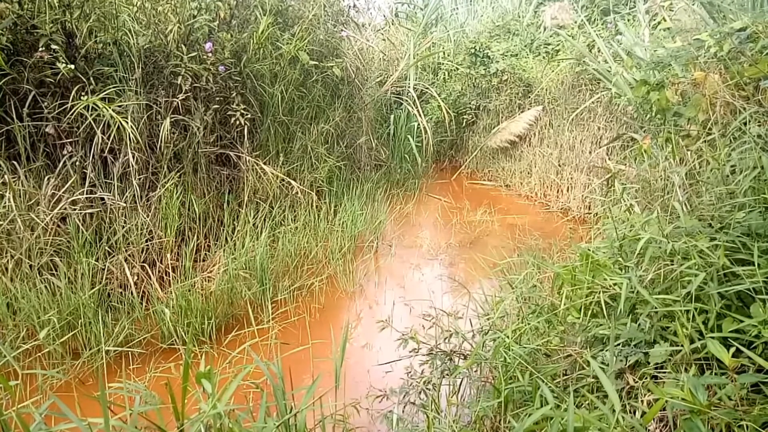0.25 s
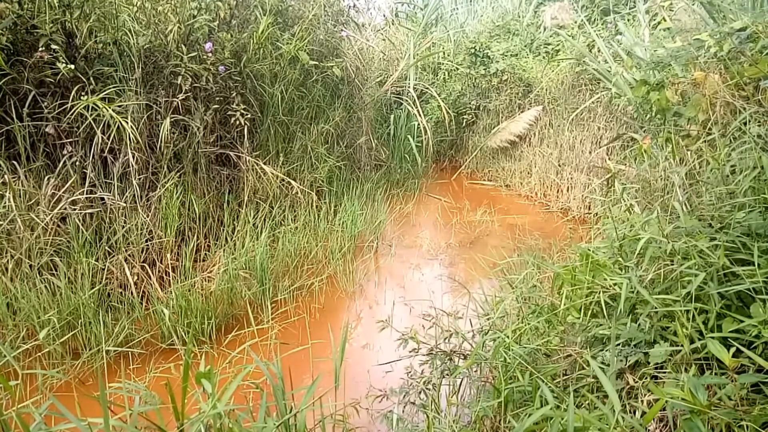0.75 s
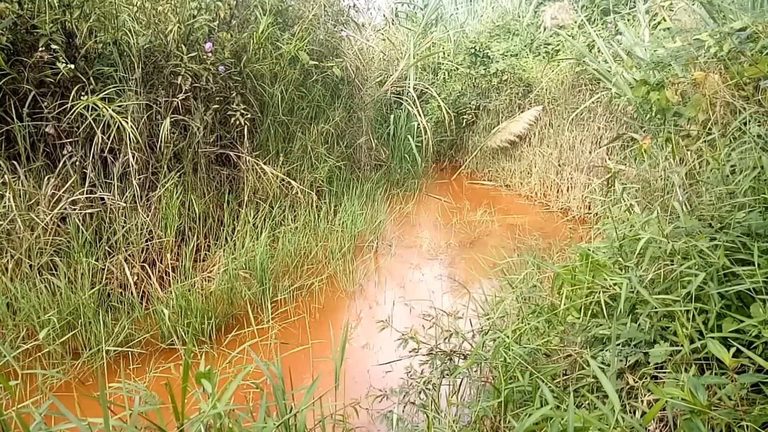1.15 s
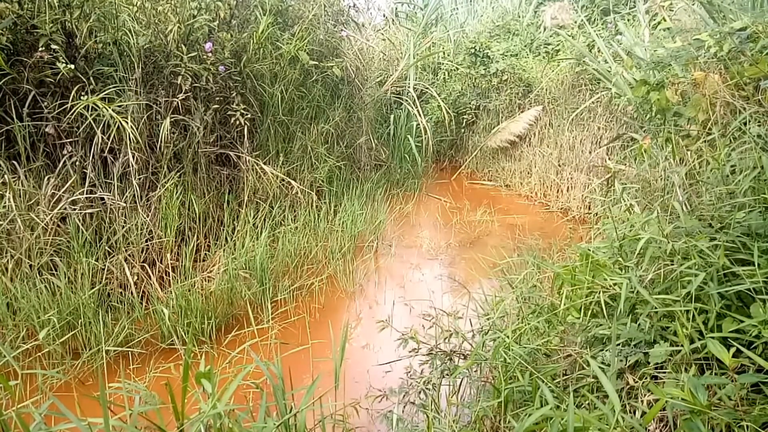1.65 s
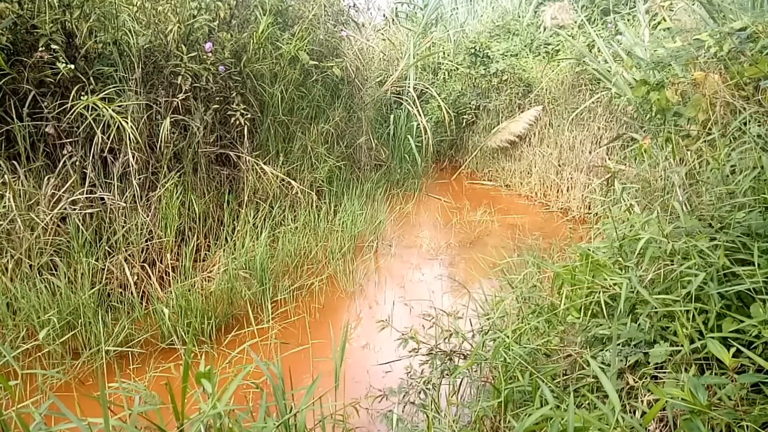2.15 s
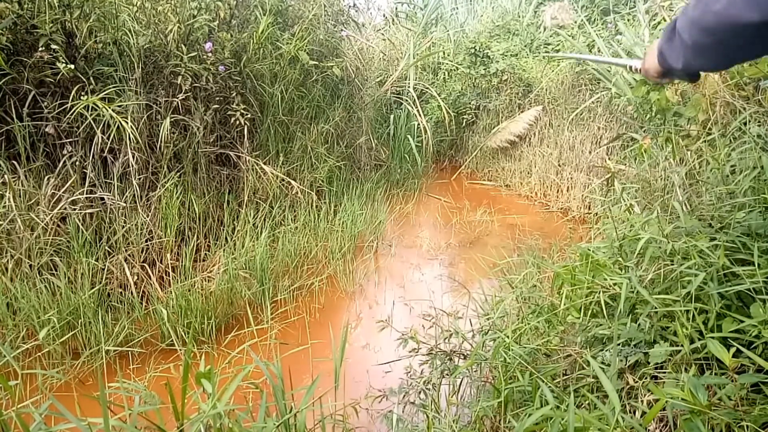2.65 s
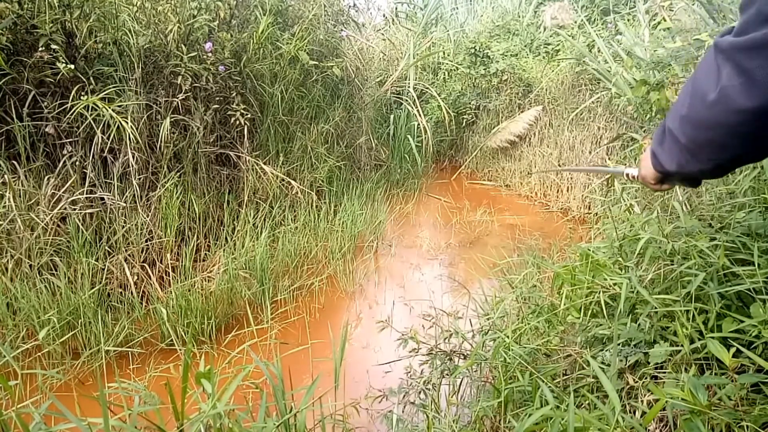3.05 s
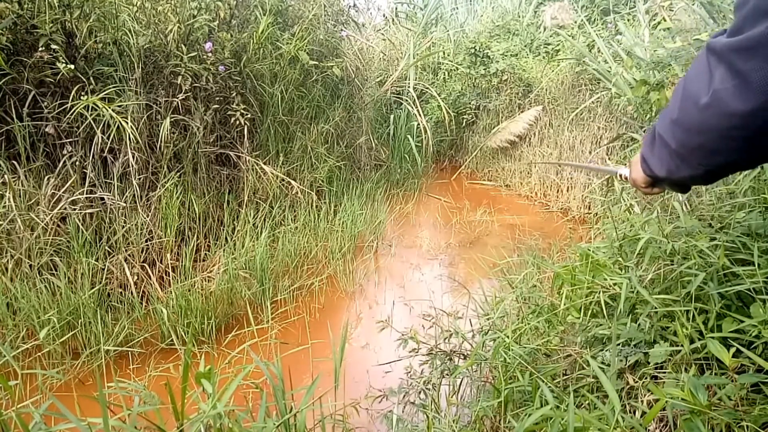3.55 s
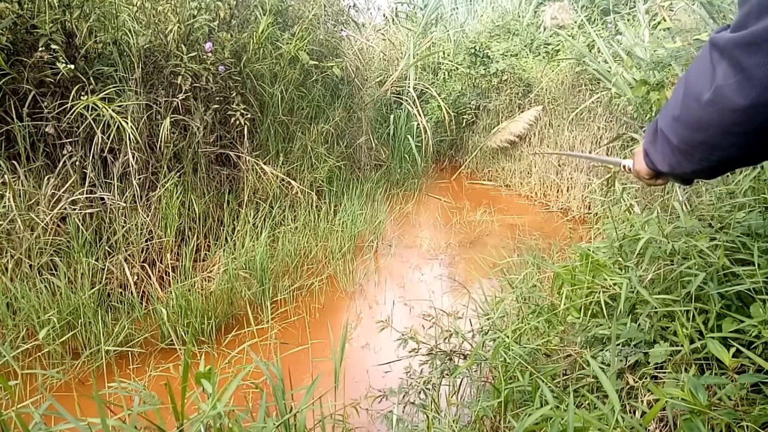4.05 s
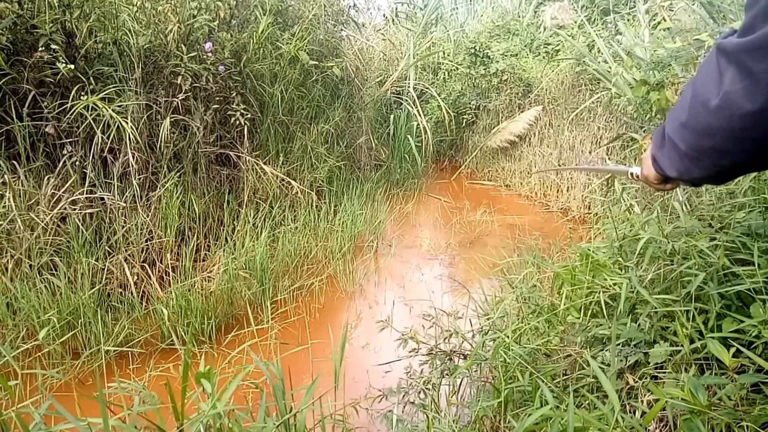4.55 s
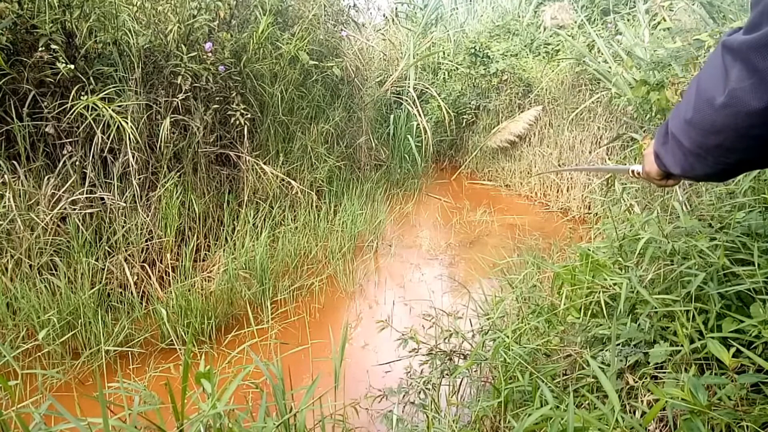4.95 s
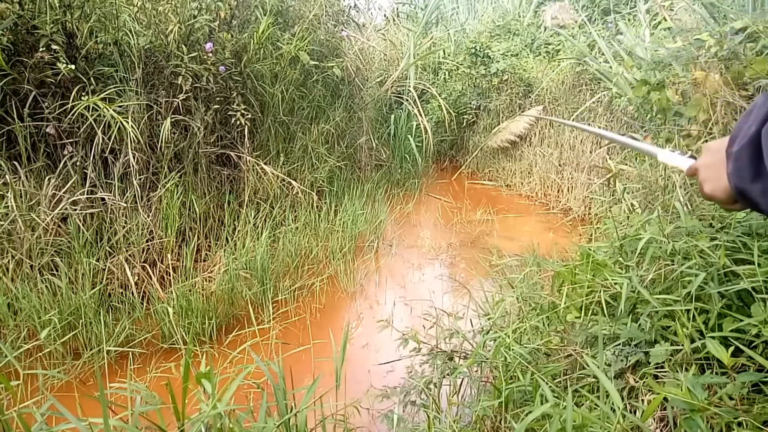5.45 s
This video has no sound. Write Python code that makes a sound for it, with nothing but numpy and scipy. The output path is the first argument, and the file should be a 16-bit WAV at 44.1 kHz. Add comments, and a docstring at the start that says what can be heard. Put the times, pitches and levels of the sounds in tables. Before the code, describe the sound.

Outdoors by a still, overgrown ditch, a near cicada and crickets buzz in fast high pulses over a far insect chorus. A bird repeats a chip, low note and rising whistle about every 0.6 seconds, with small pips, leaf rustles and a dull rod knock. Dove coos come late. The sound fades to silence, then cuts hard to insects over a slow, far engine throb.

```python
"""Insects and birds by a still ditch

A near cicada and crickets (pulsed, slightly fuzzy tones) sing over a far chorus of coloured noise.
Gliding whistles make a bird's three-note phrase, small pips and chips, and a dove's coos; leaves are
brushed noise, twigs and a rod short ringing hits. The sound fades to silence, then cuts to a second
spot where a slow engine, a train of rounded low thumps, throbs far off under the insects."""
import sys
import numpy as np
from scipy import signal
from scipy.io import wavfile
from scipy.ndimage import uniform_filter1d

SR = 44100
rng = np.random.default_rng(int(sys.argv[2]) if len(sys.argv) > 2 else 0)


def file_out(sig):
    """Save sig as 16-bit WAV at sys.argv[1]."""
    # one column per channel
    cols = np.atleast_2d(sig).T
    # limit, then scale
    lim = np.clip(cols, -1, 1)
    pcm = np.round(lim * 32767).astype(np.int16)
    wavfile.write(sys.argv[1], SR, pcm)


def volts(x):
    """Linear amplitude factor 10**(x/20) for a level x in dB, scalar or array-like."""
    e = np.asarray(x, float) / 20
    return 10 ** e


N = 252252  # samples

CUT = 5.2105  # s, where the second spot begins
EDGE_DB = -19.5  # level where a swell begins and a fade ends, against its peak


def evened(x):
    """Scales to an rms of 1."""
    return x / np.sqrt(np.mean(x ** 2) + 1e-20)


def add(mix, s, sound):
    """Lays a sound into the mix from second s."""
    part = mix[max(round(s * SR), 0):][:len(sound)]
    part += sound[:len(part)]


def bell(t, middle, half):
    """A rounded Gaussian swell around its middle."""
    return np.exp(-.5 * ((t - middle) / half) ** 2)


def fuzzy(hz, width_hz, clear):
    """A whistle on the curve hz: a steady part plus a part that fades and drifts at random; rms 1."""
    poles = np.poly(np.full(4, np.exp(-2 * np.pi * width_hz / SR)))
    settle = 3000  # samples
    random = rng.standard_normal((len(hz) + settle, 2)) @ [1, 1j]
    drift = signal.lfilter([1], poles, random)[settle:]
    response = signal.lfilter([1], poles, signal.unit_impulse(settle))
    drift /= np.sqrt(2) * np.linalg.norm(response)
    clear = np.clip(clear, 0, 1)
    wander = clear + np.sqrt(1 - clear ** 2) * drift
    carrier = np.exp(2j * np.pi * np.cumsum(hz) / SR)
    return np.sqrt(2) * (wander * carrier).real


def noise(points, patchy_db):
    """Noise of a given colour with drifting louder and softer patches; rms 1."""
    hz = np.fft.rfftfreq(1024, 1 / SR)
    f, db = np.transpose(points)
    a, b, patches = rng.standard_normal((N // 256 + 5, 513, 3)).T
    patches = uniform_filter1d(patches, size=10, axis=0)
    patches = evened(uniform_filter1d(patches, size=12, axis=1))
    colour = np.interp(np.log(hz + 1), np.log(f + 1), db, left=-90, right=-90)
    z = (a + 1j * b) * volts(colour[:, None] + patchy_db * patches)
    return evened(signal.istft(z, nperseg=1024, noverlap=768)[1][:N])


def ring(modes, seconds):
    """A struck body: sines that each die away at their own rate."""
    t = np.arange(round(seconds * SR)) / SR
    return sum(volts(db - 60 * t / t60) * np.sin(2 * np.pi * hz * t) for hz, db, t60 in modes)


def whistle(out, t, hz, db, fuzz_hz, clear):
    """A near-sine note at times t that wavers on its way through the leaves."""
    edge = np.clip(np.minimum(t - t[0], t[-1] - t) / 0.002, 0, 1)
    note = edge * volts(db) * fuzzy(hz + 0 * t, fuzz_hz, clear)
    add(out, t[t >= 0][0], note[t >= 0])


def peaked(rise, fall):
    """Time from the peak, and a level in dB that swells to it and fades after it."""
    u = np.arange(-rise, fall, 1 / SR)
    return u, EDGE_DB * np.maximum(-u / rise, u / fall)


# Colour of still air and microphone hiss. Each row: frequency in Hz, relative level in dB per Hz.
AIR_COLOUR = [(20, -8), (40, -12), (80, 2), (134, 0), (330, -6), (570, -8.5), (1100, -12), (2200, -13.5),
              (4300, -17), (5100, -26), (9500, -40), (12000, -30), (13800, -27), (15600, -26)]
# Air level in dB, before and after the cut.
AIR_LEVELS = -70, -68.5
# Colour of the far insect chorus, one list before and one after the cut.
# Each row: frequency in Hz, relative level in dB per Hz.
CHORUS_COLOURS = ([(5000, -57.5), (5600, -40.5), (5860, -27.5), (6260, -14.5), (6640, -0.5), (6970, 1.5),
                  (7470, -2), (8250, -3.5), (8420, -15), (8700, -34), (9500, -39), (9900, -45)],
                  [(4400, -36), (5000, -51), (5640, -30.5), (6170, -16), (6550, -7.5), (6940, -1),
                  (7730, -8.5), (8150, -7), (8400, -20.5), (8700, -17), (9300, -31), (9800, -45)])
# Chorus level in dB, before and after the cut.
CHORUS_LEVELS = -50, -50.5


def background():
    """Steady noise for air and hiss, and narrow high noise for many far insects; both change at the cut."""
    after = np.arange(N) > CUT * SR
    first, second = (volts(db) * noise(colour, patchy_db=0.5)
                     for colour, db in zip(CHORUS_COLOURS, CHORUS_LEVELS))
    chorus = np.where(after, second, first)
    air_db = np.where(after, AIR_LEVELS[1], AIR_LEVELS[0])
    return chorus + volts(air_db) * noise(AIR_COLOUR, patchy_db=0.78)


# The cicada's group of four pulses. Each row: place in pulses, relative level in dB.
PULSE_GROUP = [(0, -7), (1.002, -2.5), (1.918, -1.7), (2.829, -13)]
# Pulse clock: rate at 0 s, loss of rate per second, count at 0 s
PULSES_PER_S, SLOWING, PULSE_START = 81.65, .104, -.18


def cicada():
    """Short falling tone bursts in groups of four, each a little off the last in pitch and strength."""
    now = np.arange(N) / SR
    count = PULSE_START + PULSES_PER_S * now - SLOWING * now ** 2 / 2
    pulse = np.round(count)
    strength, pitch = rng.standard_normal((500, 2))[pulse.astype(int)].T
    bursts = 0
    for place, db in PULSE_GROUP:
        offset = (count - place + 2) % 4 - 2  # in pulses
        bursts = bursts + volts(db) * bell(offset, 0, 0.19)
    hz = 6890 + 500 * (pulse - count) + 14 * pitch
    tone = volts(1.6 * strength) * fuzzy(hz, width_hz=120, clear=.9)
    return volts(-41.5) * bursts * tone * (now < CUT)


# Chirping insects. Each row: pitch in Hz, fuzz in Hz, clear share, glide in Hz over a chirp's second half,
# nominal share of the period sounding, chirp centre in periods, trill in Hz (0 for none).
CHIRPERS = [(7925, 50, .9, -90, .4, 0, 0), (8220, 120, .5, -40, .55, 0, 0), (8585, 40, .7, 0, .55, 0, 0),
            (9020, 340, 0, 0, .95, .04, 124), (8900, 340, 0, 0, .95, 0, 131),
            (8950, 260, .3, 0, .68, 0, 131), (8190, 40, .85, -200, .55, .06, 0),
            (8270, 50, .85, 0, .4, -.47, 0), (9450, 180, 0, 0, .8, 0, 0)]
# Level of each voice. Each row: dB at its start, dB at its end.
CHIRPER_LEVELS = [(-53, -53.5), (-58, -58), (-73, -70), (-65, -65), (-73, -64), (-64, -62), (-51.5, -51.5),
                  (-54, -54), (-80, -79)]
# Song of each voice. Each row: start in seconds, end in seconds, chirps per second,
# share of a period gone at the start.
CHIRPER_SONGS = [(0, 5.2, 12.13, .62), (0, 5.2, 13.45, .3), (0, 3.3, 13.45, .31), (0, 1.1, 7.27, .57),
                 (2.4, 5.2, 8.25, .55), (5.21, 5.72, 8.35, .45), (5.21, 5.72, 12.9, .77),
                 (5.21, 5.72, 12.9, .74), (1.3, 4.1, 12.85, .5)]


def crickets():
    """Each voice opens once a period; katydids also trill within the chirp."""
    out = np.zeros(N)
    for voice, levels, song in zip(CHIRPERS, CHIRPER_LEVELS, CHIRPER_SONGS):
        hz, fuzz_hz, clear, glide_hz, share, centre, trill_hz = voice
        start, end, rate, gone = song
        t = np.arange(start, end, 1 / SR)
        period = gone + rate * (t - start) - centre
        place = ((period + .5) % 1 - .5) / share  # -.5 to .5 within a chirp
        gate = np.clip(2.6 * (.5 - abs(place)) + .3, 0, 1) ** 2
        trill = 1 + .6 * np.cos(2 * np.pi * trill_hz * t) * (trill_hz > 0)
        glide = glide_hz * np.clip(place, 0, .5) ** 2 * 4
        tone = fuzzy(hz + glide, fuzz_hz, clear)
        add(out, start, volts(np.interp(t, [start, end], levels)) * gate * trill * tone)
    return out


# Colour of the leaves, one list for body and one for treble.
# Each row: frequency in Hz, relative level in dB per Hz.
LEAF_COLOURS = ([(1500, -21), (3000, -13.5), (4300, -8.5), (5600, -1.5), (7000, 1.5), (9000, -34)],
                 [(7000, -26), (9500, -8), (13000, -11.5), (15600, -11)])
# Leaves brushed. Each row: peak time in seconds, body level in dB, treble level in dB,
# body rise in dB per second, body fall in dB per second.
LEAF_BRUSHES = [(0, -51.5, -64.5, 100, 139), (1.881, -88.5, -97.5, 94, 49), (2.149, -58, -84, 61, 39.5),
                (2.5, -69.5, -97.5, 25.5, 65), (3.08, -71, -90.5, 25, 48), (5.3, -62.5, -93.5, 140.5, 42)]
STIR_DB, STIR_TREBLE_DB = -82, -88  # leaves stirring all the time
TREBLE_FOLLOWS = 0.83  # share of the body's rise and fall in dB that the treble makes


def leaves():
    """Many small rubbing contacts heard as patchy noise, swelling with each brush."""
    now = np.arange(N) / SR
    body, treble = (noise(colour, patchy_db=2.8) for colour in LEAF_COLOURS)
    out = volts(STIR_DB) * body + volts(STIR_TREBLE_DB) * treble
    for s, db, treble_db, rise, fall in LEAF_BRUSHES:
        off_db = np.maximum(rise * (s - now), fall * (now - s))
        same_spot = (now > CUT) == (s > CUT)
        brushed = volts(db - off_db) * body + volts(treble_db - TREBLE_FOLLOWS * off_db) * treble
        out += same_spot * brushed
    return out


# Rising notes. Each row: start in seconds, length in seconds, level in dB, top pitch in Hz,
# lead-in before it in seconds.
RISING_NOTES = [(.206, 0.17, -49, 2285, 0.018), (0.788, .145, -47.5, 2317, 0.027),
                (1.441, 0.12, -49, 2232, 0.032), (2.024, .15, -49, 2306, 0.054),
                (2.618, .16, -48, 2268, 0.03), (3.244, 0.11, -48, 2281, 0.042),
                (3.862, .13, -51, 2246, 0.055), (4.468, .14, -50, 2307, 0.058),
                (5.072, 0.08, -54.5, 2270, 0.041)]
# Low closing notes. Each row: peak time in seconds, level in dB, pitch at the peak in Hz.
LOW_NOTES = [(0.011, -53.5, 1706), (0.574, -58.5, 1699), (1.221, -55, 1717), (1.817, -57.5, 1717),
             (2.395, -52.5, 1712), (3.017, -55, 1683), (3.621, -50.5, 1715), (4.24, -51.5, 1690),
             (4.845, -58, 1665)]
FOOT_HZ, CLIMB_BEND = 2074, 1.69  # the pitch climbs from here to its top, slowing on the way
SWELL_DB, SWELL_S, CLOSE_DB, CLOSE_S = -9.5, .06, -7.5, 0.051  # soft start, fading end
LEAD_HZ, LEAD_SCOOP_HZ, LEAD_SCOOP_S = 1960, 330, .008  # scooped up from below
LEAD_DB, LEAD_FADE_DB = -11, -8  # against the rising note
LOW_RISE_S, LOW_FALL_S, LOW_GLIDE_HZ_PER_S = .045, .065, 550


def phrase():
    """Near-sine whistles: a scooped lead-in, a rising note and a low closing note."""
    out = np.zeros(N)
    for s, length, db, hz, lead in RISING_NOTES:
        u = np.arange(0, lead, 1 / SR)
        scoop = np.exp(-u / LEAD_SCOOP_S)
        lead_db = db + LEAD_DB + EDGE_DB * scoop + LEAD_FADE_DB * u / lead
        whistle(out, s - lead + u, LEAD_HZ - LEAD_SCOOP_HZ * scoop, lead_db, fuzz_hz=60, clear=.7)

        u = np.arange(0, length, 1 / SR)
        climb = hz - (hz - FOOT_HZ) * (1 - u / length) ** CLIMB_BEND
        swell_db = SWELL_DB * np.clip(1 - u / SWELL_S, 0, 1)
        close_db = CLOSE_DB * np.clip(1 - (length - u) / CLOSE_S, 0, 1)
        whistle(out, s + u, climb, db + (swell_db + close_db), fuzz_hz=60, clear=.86)
    for s, db, hz in LOW_NOTES:
        u, shape_db = peaked(LOW_RISE_S, LOW_FALL_S)
        whistle(out, s + u, hz + LOW_GLIDE_HZ_PER_S * u, db + shape_db, fuzz_hz=60, clear=.82)
    return out


# Thin pips. Each row: peak time in seconds, level in dB, settled pitch in Hz, fade in seconds.
THIN_PIPS = [(0.011, -57, 2830, 0.14), (.068, -56, 3230, 0.058), (.688, -63.5, 5250, .2),
             (1.238, -59, 5120, 0.16), (1.833, -63, 4990, 0.15), (2.029, -66, 5200, 0.053),
             (2.24, -60, 2800, 0.11), (2.274, -74, 3240, .15), (3.9, -70, 2930, 0.12),
             (3.954, -67, 2740, .06), (3.963, -72, 3240, .05), (5.437, -62.5, 3270, 0.06)]
# Buzzy notes. Each row: peak time in seconds, level in dB, pitch in Hz, rise in seconds, fade in seconds.
BUZZY_NOTES = [(1.031, -69, 4400, 0.034, .14), (1.409, -55.5, 4505, 0.082, 0.1),
               (2.5, -62.5, 4570, 0.077, .14), (3.5, -62.5, 4640, 0.026, .2), (4.535, -70, 4520, .09, .09),
               (5.012, -67, 4550, 0.0092, 0.086), (5.539, -62.5, 4670, .03, 0.044)]
PIP_RISE_S, PIP_DROP_HZ, PIP_DROP_S = 0.014, 119, 0.0059


def small_birds():
    """Pips that drop onto their pitch and fade, and buzzy notes that are mostly random drift."""
    out = np.zeros(N)
    for s, db, hz, fade in THIN_PIPS:
        u, shape_db = peaked(PIP_RISE_S, fade)
        drop = PIP_DROP_HZ * np.exp(-(u - u[0]) / PIP_DROP_S)
        whistle(out, s + u, hz + drop, db + shape_db, fuzz_hz=81, clear=0.49)
    for s, db, hz, rise, fade in BUZZY_NOTES:
        u, shape_db = peaked(rise, fade)
        whistle(out, s + u, hz, db + shape_db, fuzz_hz=160, clear=.2)
    return out


# Chips, the main ones and then higher ones.
# Each row: start in seconds, level in dB before a 0.5 dB trim, pitch in Hz.
MAIN_CHIPS = [(0.4884, -46, 2707), (1.1433, -45.5, 2695), (1.7236, -49.5, 2670), (2.3128, -48, 2684),
              (2.9282, -47.5, 2586), (3.5417, -47, 2585), (4.1484, -46.5, 2733), (4.7657, -53.5, 2547)]
HIGHER_CHIPS = [(1.8063, -65, 5710), (1.8422, -55, 6010), (2.0041, -53.5, 5460)]
SLIDE_DB, SLIDE_S, SLIDE_OCTAVES = -27, .028, .72  # the faint slide from a chip down to the low note


def chips():
    """A faint low pick-up, a quick drop onto the pitch struck twice, a rasp below it and a thin slide down."""
    out = np.zeros(N)
    t = np.arange(round(.12 * SR)) / SR - .03
    for s, db, hz in MAIN_CHIPS + HIGHER_CHIPS:
        drop = 0.14 * np.exp(-np.maximum(t, 0) / 0.0012)
        tone = fuzzy(hz * (1 + drop), width_hz=75, clear=0.95)
        strokes = bell(t, .007, 0.0033) + volts(0.5) * bell(t, .019, 0.003)
        pick_up = volts(-24) * bell(t, -.016, .005) * fuzzy(.68 * hz + 0 * t, width_hz=400, clear=0)
        rasp_level = volts(-13 - 240 * abs(t - .02)) * np.clip(t / 0.003, 0, 1)
        rasp = rasp_level * fuzzy(hz * (.99 - 1.6 * t), width_hz=280, clear=0)
        down = np.clip((t - .012) / SLIDE_S, 0, 1)
        slide_tone = fuzzy(hz / 2 ** (SLIDE_OCTAVES * down), width_hz=79, clear=0.94)
        slide = volts(SLIDE_DB) * np.sin(np.pi * down) * slide_tone
        add(out, s - .03, volts(db - 0.5) * (strokes * tone + pick_up + rasp + slide))
    return out


# Twig ticks. Each row: start in seconds, peak level in dB, brightness in Hz.
TWIG_TICKS = [(0.6672, -68, 13840), (0.8608, -62.5, 10500), (1.0349, -80.5, 12400), (2.0716, -78, 10700),
              (2.1725, -68, 14130), (2.9521, -65, 9980), (5.4328, -48.5, 12500)]


def twigs():
    """Dry snaps: high fuzzy tones that die away 60 dB in 4.6 ms."""
    out = np.zeros(N)
    t = np.arange(400) / SR
    for s, db, hz in TWIG_TICKS:
        add(out, s, volts(db - 60 * t / 0.0046) * fuzzy(hz + 0 * t, width_hz=480, clear=0.74))
    return out


# Dull knocks of the hand-held rod. Each row: start in seconds, level in dB.
ROD_KNOCKS = [(2.174, -79.5), (2.729, -53)]
# Resonances of the rod. Each row: frequency in Hz, relative level in dB, 60 dB decay time in seconds.
ROD_MODES = [(913, -10, 0.094), (1440, -18, 0.035), (3264, -12, 0.19), (3488, 10, 0.021),
             (3840, -12, 0.068), (4370, -12, .02)]


def rod():
    """The rod rings at each knock, blurred by a short random burst of weakening hits."""
    out = np.zeros(N)
    hits = rng.random(1500) < .006
    blur = hits * volts(-300 * np.arange(1500) / SR - 6.0) + signal.unit_impulse(1500)
    for s, db in ROD_KNOCKS:
        add(out, s, volts(db) * np.convolve(ring(ROD_MODES, 0.29), blur))
    return out


# A puff of wind on the microphone. The row: peak time in seconds, level in dB, pitch in Hz,
# half-length in seconds.
WIND_PUFF = 3.3, -61, 90, .018


def puff():
    """A soft low thud: a few cycles of a sine in a rounded swell."""
    now = np.arange(N) / SR
    s, db, hz, half = WIND_PUFF
    return volts(db) * bell(now, s, half) * np.sin(2 * np.pi * hz * now)


# Dove coos. Each row: start in seconds, length in seconds, early level in dB, late level in dB,
# pitch in Hz at the reference effort.
DOVE_COOS = [(4.125, 0.13, -68, -70, 613.4), (4.438, 0.2, -53, -71, 600), (4.644, .165, -63, -56, 620),
             (4.791, 0.23, -57, -54.5, 612), (4.863, 0.22, -61.5, -61.5, 716)]
COO_REST_DB, COO_HZ_PER_DB, COO_EDGE_S = -60, 4.5, 0.027  # reference effort, pitch rise, soft ends


def dove():
    """Husky coos whose pitch rises with effort."""
    out = np.zeros(N)
    for s, length, early_db, late_db, hz in DOVE_COOS:
        u = np.arange(0, length, 1 / SR)
        edge_db = EDGE_DB * np.clip(1 - np.minimum(u, length - u) / COO_EDGE_S, 0, 1)
        db = early_db + (late_db - early_db) * u / length + edge_db
        whistle(out, s + u, hz + COO_HZ_PER_DB * (db - COO_REST_DB), db, fuzz_hz=75, clear=0.8)
    return out


# Exhaust resonances. Each row: frequency in Hz, relative level in dB, thump half-length in seconds.
EXHAUST_MODES = [(78, -13, 0.033), (121.6, 3.5, 0.01), (150, -4.5, 0.021), (229, -8.5, 0.0028)]
# Relative strength of the three cylinders in dB.
CYLINDER_LEVELS = [-0.5, -5.5, -3.5]
# Colour of the rumble around the thumps. Each row: frequency in Hz, relative level in dB per Hz.
RUMBLE_COLOUR = [(25, -16), (60, -9), (90, -5), (150, -1), (200, -4.5), (300, -18), (700, -26),
                 (1500, -31.5)]
FIRINGS_PER_S, FIRST_FIRING = 21.2, 5.2195  # mean rate, nominal middle of the first thump in s


def engine():
    """Uneven firings, softened by distance to rounded thumps in a low rumble."""
    k = np.arange(12)
    late, strong = rng.standard_normal((12, 2)).T
    t = np.arange(-2000, 2000) / SR
    out = np.zeros(N + 2000)
    thump = sum(volts(db) * bell(t, 0, half) * np.cos(2 * np.pi * hz * t) for hz, db, half in EXHAUST_MODES)
    times = FIRST_FIRING + k / FIRINGS_PER_S + 0.0013 * late
    levels = np.take(CYLINDER_LEVELS, k % 3) + 0.54 * strong
    for s, db in zip(times, levels):
        add(out, s + t[0], volts(db - 42.0) * thump)
    rumble = volts(-54.5) * noise(RUMBLE_COLOUR, patchy_db=2.5)
    return (out[:N] + rumble) * (np.arange(N) > CUT * SR)


def scrub(x, t60):
    """Scattered echoes from stems and banks: sparse taps of random sign dying away."""
    taps = np.zeros(SR // 2)
    at = np.arange(200, SR // 2 - 22, 22)
    signs = rng.choice([-1., 1.], len(at))
    taps[at + rng.integers(0, 22, len(at))] = signs * volts(-60 * at / SR / t60)
    return signal.fftconvolve(x, taps / np.linalg.norm(taps))[:N]


def scene():
    """Birds and insects with their echoes, over the background, leaves, knocks and engine."""
    insects = cicada() + crickets()
    birds = phrase() + small_birds() + chips() + dove()
    echoes = volts(-7) * scrub(birds, t60=0.29) + volts(-10.5) * scrub(insects, t60=0.075)
    rustle = leaves() + twigs() + rod() + puff()
    return (background() + birds + insects + echoes + rustle + engine())[None]


FADE_END, FADE_S, FADE_POWER = 5.135, 0.18, 2.84  # silence reached at s, length in s, steepness


def low_pass(x):
    """Removes everything above the highest recorded frequency."""
    return signal.sosfilt(signal.butter(12, 15480, fs=SR, output="sos"), x)


def record(dry):
    """An edited fade to silence, then a hard cut to the second spot at full level."""
    t = np.arange(N) / SR
    fade = np.clip((FADE_END - t) / FADE_S, 0, 1) ** FADE_POWER
    gain = np.where(t > CUT, 1, fade)
    return low_pass(dry * gain)


dry = scene()
out = record(dry)
file_out(out)
```